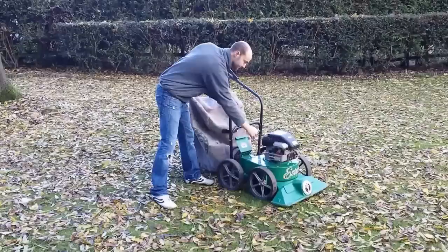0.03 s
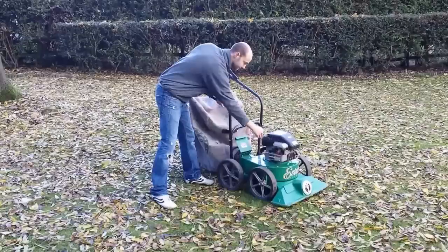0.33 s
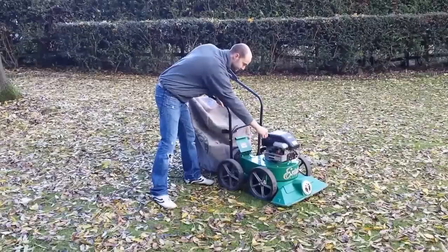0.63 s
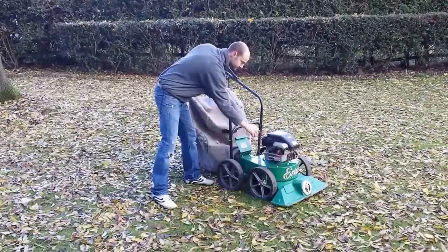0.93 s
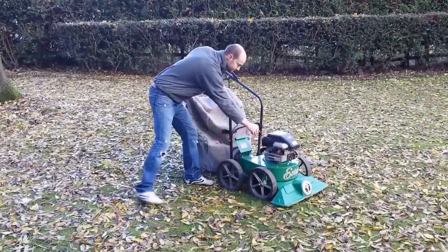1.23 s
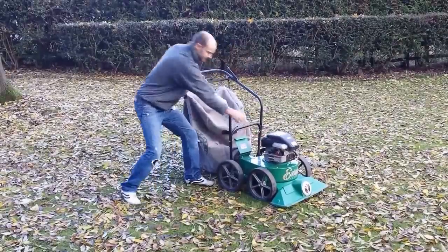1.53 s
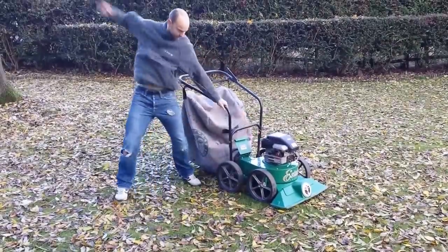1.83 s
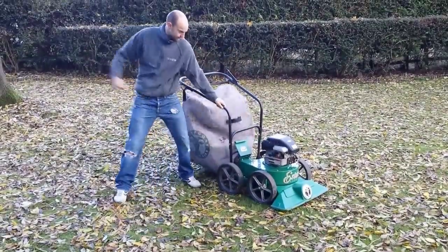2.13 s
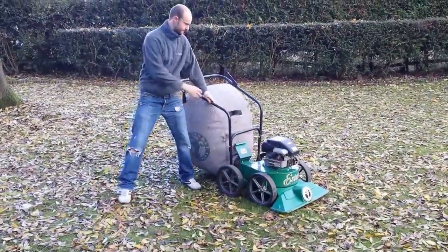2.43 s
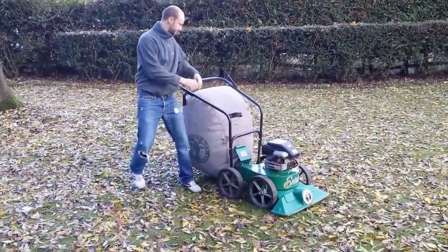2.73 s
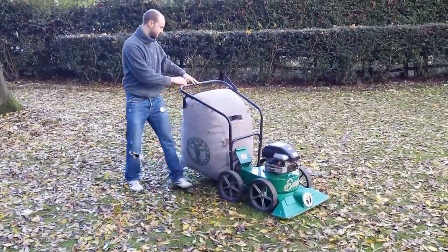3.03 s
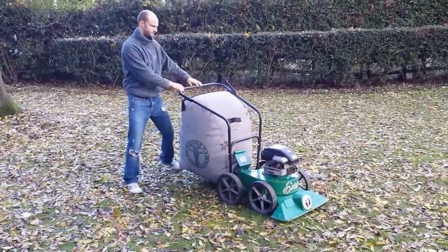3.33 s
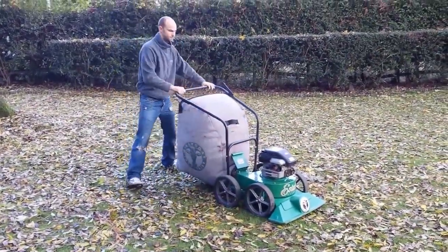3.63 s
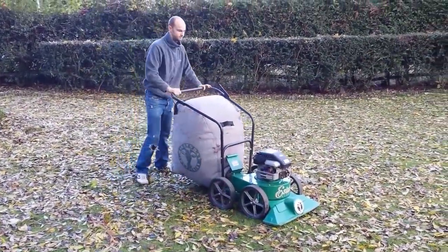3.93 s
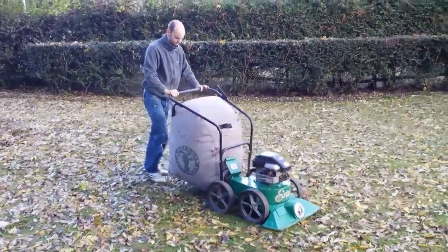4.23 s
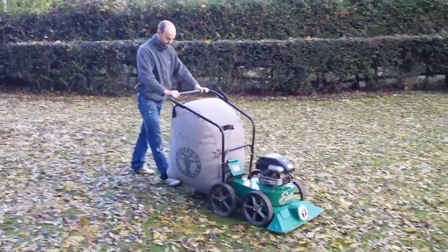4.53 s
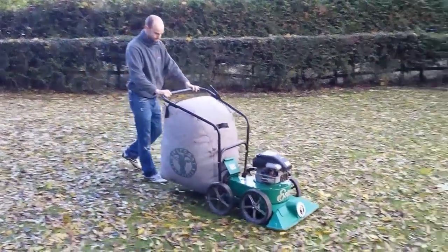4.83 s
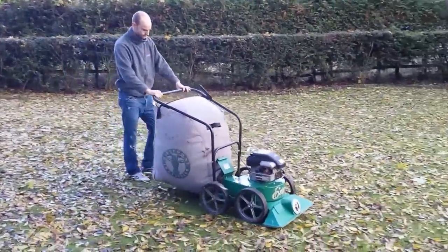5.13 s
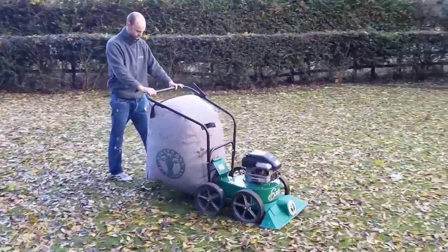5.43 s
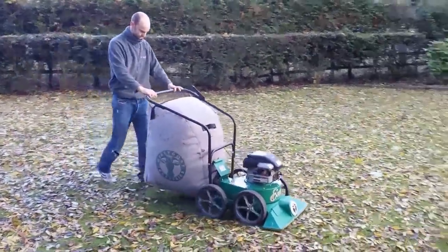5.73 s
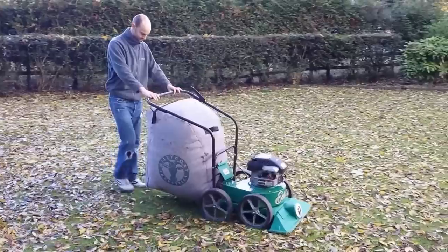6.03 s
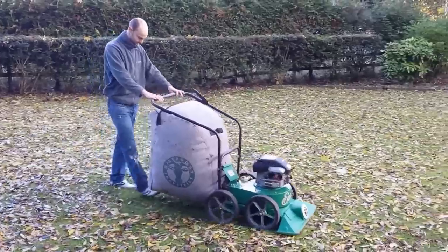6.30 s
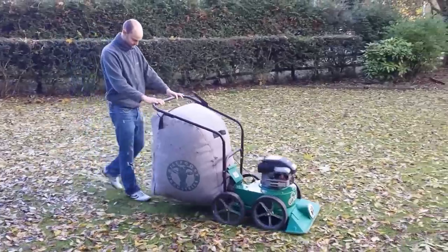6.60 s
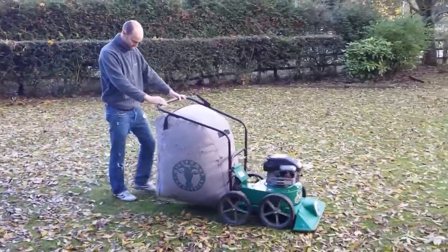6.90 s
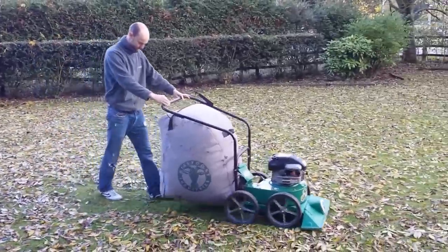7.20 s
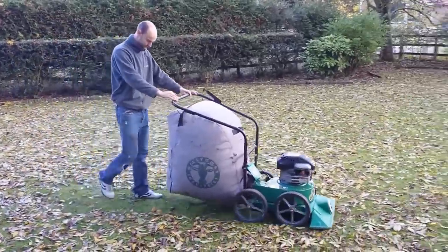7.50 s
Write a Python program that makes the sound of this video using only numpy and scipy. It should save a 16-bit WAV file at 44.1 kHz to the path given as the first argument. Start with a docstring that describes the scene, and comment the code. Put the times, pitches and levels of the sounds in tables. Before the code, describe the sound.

After a moment of silence, a faint far-off engine hum and outdoor wash come in at about 0.4 seconds. A metal lever snaps sharply at 0.9 seconds. Clothes and leaves rustle from 1.3 seconds, then a starter cord whirrs out at around 1.6, with rasping chatter and a few hard clacks. At 1.8 seconds the lawn vacuum's small petrol engine catches, a few metres from the microphones, and rises in pitch to a loud drone with a thumping, spitting exhaust and metallic ticking. Dull bumps and a ringing clank come between 2.5 and 2.8 seconds. Dry leaves rattle and hiss through the housing. The engine sags from about 3.9 seconds and recovers by 5.5. Twigs crack sharply against the housing several times between 4.4 and 7 seconds. The drone turns slightly buzzier late on and runs to the end, at about 7.6 seconds.

```python
"""A leafy lawn, two microphones a few metres from a petrol lawn vacuum, another engine humming far off.
A lever clicks, the cord is pulled, and the four-stroke single runs up to its governed speed.
Its impeller drones, the exhaust thumps and spits once every two turns, and sucked-up leaves
rattle through the housing. The engine sags under load and recovers; late on, the machine turns side-on."""
import sys
import numpy as np
from scipy import signal
from scipy.fft import rfft, irfft
from scipy.io import wavfile
from scipy.ndimage import uniform_filter1d, map_coordinates

SR = 44100
rng = np.random.default_rng(int(sys.argv[2]) if len(sys.argv) > 2 else 0)


def to_wav(sig):
    """Store sig (one row per channel, or 1-D mono) as 16-bit WAV at the path in sys.argv[1].

    Samples outside -1..1 are clipped; the rate is SR.
    """
    pcm = np.clip(np.atleast_2d(sig), -1, 1) * 32767
    pcm = np.round(pcm).astype(np.int16)
    wavfile.write(sys.argv[1], SR, pcm.T)  # frames by channels


N = 333396
T = np.arange(N) / SR
PULL_S, SUCTION_S, FIRST_FIRING_S = 1.515, 1.755, 1.829
GOVERNED_SPEED = 55.79  # turns per second

# the far engine's lowest tones, beating together (frequency [Hz], level [dB])
FAR_TONES = [(57.5, -43.5), (64.5, -73)]
# its third harmonic comes and goes (start [s], length [s], level [dB])
FAR_THIRD_SWELLS = [(.4, 0.15, -41.5), (.79, 0.41, -36)]
# the wash of the neighbourhood (frequency [Hz], level [dB])
WASH_COLOUR = [(20, -24), (50, -4.5), (200, -9.5), (330, -9.5), (450, -15), (850, -14), (1900, -24.5),
               (5500, -31), (8000, -40), (15000, -56)]
# the control lever snapping over and settling (time [s], level [dB])
LEVER_SNAPS = [(0.9195, -15), (0.937, -26), (1.038, -39)]
# the lever's resonances (frequency [Hz], width [Hz], level [dB])
LEVER_MODES = [(910, 150, 3), (2640, 660, -5), (3700, 740, -3), (4280, 250, -7), (4380, 440, -1),
               (5720, 140, 0.5), (8600, 1200, -11.5)]
# the crack of a hard hit (frequency [Hz], level [dB])
CRACK_COLOUR = [(200, -7.5), (900, -23), (2200, -7), (3300, 4.5), (5000, 16), (7000, 0.5), (15000, -20)]
# shoes and sleeve rustling, then the cord running out (start [s], length [s], level [dB])
RUSTLES = [(1.26, 0.085, -41), (1.46, 0.14, -40.5), (1.64, 0.1, -30.5)]
# the hiss of leaves, cloth and rushing air (frequency [Hz], level [dB])
RUSTLE_COLOUR = [(200, -26), (700, -16), (1900, -12.5), (2800, -8), (3800, -3.5), (5000, 0.5), (5700, -2),
                 (6800, -9.5), (9500, -9.5), (12000, -11.5), (14500, -21.5)]
# the machine body's resonances (frequency [Hz], width [Hz], level [dB])
BODY_MODES = [(305, 37, 3), (553, 91, 2), (716, 294, 0), (910, 230, 1), (1375, 280, -1.5),
              (2240, 450, -6.5)]
# the cord whirring through its guide (start [s], length [s], level [dB])
CORD_WHIRR = [(1.63, .19, -35)]
# the starter rasping as the cord runs out and winds back (time [s], ring [Hz], level [dB])
REEL_RASPS = [(1.64, 2800, -36.5), (1.68, 1400, -33), (1.743, 1430, -24.5), (1.757, 2920, -21.5),
              (1.801, 1640, -22.5), (1.855, 2640, -20.5), (1.935, 2560, -24.5), (2.015, 6860, -15)]
# patches of leaves under the nozzle (start [s], length [s], level [dB])
LEAF_PATCHES = [(1.76, 0.39, -27), (3.78, 0.034, -31), (4.24, 0.92, -27.5), (5.6, 2.0, -30)]
# sharp knocks on the impeller and housing (time [s], level [dB])
HOUSING_STRIKES = [(1.7654, -9.5), (1.7853, -3), (1.877, -2), (2.667, -10), (4.379, -4), (4.5375, -4),
                   (4.6159, -14), (5.1272, -7), (5.2886, -6), (6.169, -1.5), (6.512, -5), (6.9797, -4.5)]
# the muffler's resonances (frequency [Hz], width [Hz], level [dB])
MUFFLER_MODES = [(85, 35, 0), (128, 74, 3), (205, 77, 3), (290.5, 77, -2)]
# the spit of exhaust gas (frequency [Hz], level [dB])
SPIT_COLOUR = [(500, -12.5), (2500, -16), (4800, 7), (7000, -3.5), (9000, 2.5), (14500, -6)]
# duct resonances that the drone sweeps through (frequency [Hz], half width [Hz], gain [dB])
DUCT_MODES = [(116.4, 22, 9.5), (195.3, 8.6, 7)]
# the drone's weaker harmonics at governed speed (harmonic [number], level [dB])
DRONE_HARMONICS = [(3, -36), (4, -52), (5, -46.5), (6, -47), (7, -54), (8, -53)]
# the drone swells or sinks briefly (time [s], half length [s], gain [dB])
DRONE_SWELLS = [(2.493, 0.076, 10), (4.14, .14, 7), (4.9, 0.088, 2), (5.76, 0.55, -2.4)]
# its third harmonic fades for a while (time [s], half length [s], gain [dB])
THIRD_DIPS = [(3.1, 0.18, -7), (5.463, 0.53, -10.5)]
# dull bumps (time [s], level [dB])
BUMPS = [(2.49, -23), (2.65, -19.5), (3.935, -17)]
# hard debris hitting the impeller (time [s], level [dB])
DEBRIS_HITS = [(2.7505, -8.5)]
# the impeller's ring (frequency [Hz], width [Hz], level [dB])
IMPELLER_MODES = [(1410, 82, -2), (3270, 280, -1), (5120, 200, 2)]
# likeness of the two microphones (frequency [Hz], correlation [0 to 1])
MIC_LIKENESS = [(25, 0.75), (90, .995), (650, 0.7), (1400, 0.75), (4000, 0.55), (14000, 0.049)]
# left microphone minus right (frequency [Hz], level [dB])
MIC_BALANCE = [(100, -1), (300, -2.5), (800, -0.5), (1400, 0), (2000, 3.5), (2400, 3.5), (3300, 12.5),
               (4400, 12), (5400, 12.5), (6600, 3), (7800, 6.5), (10000, 5), (14000, 2.5)]
# the left microphone's lead over the right (frequency [Hz], phase [rad])
MIC_PHASE = [(700, 0), (1120, 1.47), (1380, 0.63), (1720, 1.48), (2070, 1), (3100, 1.66), (6000, 0.4),
             (14000, 1.5)]


def amp(db):
    return 10 ** (np.asarray(db) / 20)


def unit(x):
    """Scale to rms 1."""
    return x / np.sqrt(np.mean(x ** 2))


def across(points):
    """Spread (frequency [Hz], value) rows over the frequency axis."""
    hz, value = np.transpose(points)
    return np.interp(np.log(np.arange(N + 1) * SR / (2 * N) + 1), np.log(hz), value)


def shape(x, response):
    """Filter by a frequency response."""
    return irfft(rfft(x, 2 * N) * response)[..., :N]


def colour(x, points):
    """Filter by (frequency [Hz], level [dB]) rows, to rms 1."""
    return unit(shape(x, amp(across(points))))


def ring(x, modes):
    """Resonances side by side, of alternating sign."""
    return sum((-1) ** k * amp(db) * signal.lfilter(*signal.iirpeak(hz, hz / width, SR), x)
               for k, (hz, width, db) in enumerate(modes))


def air():
    """Noise at both microphones: alike in the bass, drifting apart in the treble."""
    likeness = np.clip(across(MIC_LIKENESS), 0, 1)
    mid, side = shape(rng.standard_normal((2, N)), np.sqrt([1 + likeness, 1 - likeness]))
    return unit(np.array([mid + side, mid - side]))


def walk(per_s):
    """Smooth random wander with a spread near 1."""
    return map_coordinates(rng.standard_normal(4096), [T * per_s], order=3, mode="wrap")


def fade(hits, t60):
    """Each hit jumps up and dies away, by 60 dB in t60 seconds."""
    return signal.lfilter([1], [1, -amp(-60 / (t60 * SR))], hits + 1e-18)


def blows(rows):
    """One impulse for each (time [s], level [dB]) row."""
    s, db = np.transpose(rows)
    return np.bincount((s * SR).astype(int), amp(db), N)


def beats(cycle):
    """One impulse each time the cycle comes round."""
    return np.diff(np.floor(cycle), prepend=np.floor(cycle[0]))


def swells(rows, attack_s, release_s):
    """Each (start [s], length [s], level [dB]) row rises, holds and dies away."""
    return sum(amp(db) * (1 - np.exp(-np.maximum(T - s, 0) / attack_s))
               * np.exp(-np.maximum(T - s - length, 0) / release_s) for s, length, db in rows)


def humps(x, rows):
    """A bell-shaped rise or dip along x for each (centre, half width, gain [dB]) row."""
    return sum(db * np.exp(-((x - centre) / width) ** 2) for centre, width, db in rows)


def far_engine(hz=65):
    """Far off, an engine hums in the wash of the neighbourhood; both recede once the vacuum runs."""
    angle = 2 * np.pi * hz * T + 0.046 * walk(2.8)
    hum = sum(amp(db) * np.sin(2 * np.pi * tone_hz * T) for tone_hz, db in FAR_TONES)
    third = swells(FAR_THIRD_SWELLS, attack_s=0.067, release_s=.08)
    hum += amp(-38) * np.sin(2 * angle) + third * np.sin(3 * angle)
    wash = colour(air(), WASH_COLOUR) * amp(-35 + 0.2 * walk(6.1))
    return (np.sqrt(2) * hum + wash) * amp(np.interp(T, [1.8, 2.8], [0, -8]))


def lever():
    """The metal lever snaps over with a crack and rings on faintly."""
    hits = blows(LEVER_SNAPS)
    metal = amp(-4) * (unit(ring(air(), LEVER_MODES)) + colour(air(), CRACK_COLOUR))
    return metal * (fade(hits, t60=0.038) + amp(-14) * fade(hits, t60=0.27))


def rustle():
    """Leaves and cloth rub in short, grainy hisses around the pull."""
    hiss = colour(air() * amp(2.5 * walk(280)), RUSTLE_COLOUR)
    return hiss * swells(RUSTLES, attack_s=0.025, release_s=0.074)


def clatter(cycle, level_db=-32):
    """Valves, piston and deck knock alike every cycle, over loose rattling that swells each turn."""
    pattern = rng.standard_normal(400) * amp(2.1 * rng.standard_normal(400))
    knocks = np.interp(cycle % 1, np.linspace(0, 1, len(pattern)), pattern) * amp(2 * walk(60))
    loose = air() * amp(2 * np.cos(4 * np.pi * cycle))
    body = unit(amp(-2) * unit(ring(knocks, BODY_MODES)) + unit(ring(loose, BODY_MODES)))
    return body * amp(level_db + 2 * side_on() ** 2) * np.clip((T - PULL_S) / 0.35, 0, 1)


def cord(start_hz=1300, rise_hz_per_s=1150):
    """The cord runs through its guide ever faster: a rough whirr that rises in pitch."""
    hz = start_hz + rise_hz_per_s * np.clip(T - PULL_S, 0, .25)
    angle = 2 * np.pi * np.cumsum(hz) / SR
    whirr = walk(140) * np.cos(angle) + walk(140) * np.sin(angle)
    return whirr * swells(CORD_WHIRR, attack_s=.1, release_s=.02)


def starter_reel(width_share=0.23, rise_s=0.0088):
    """The reel and its pawls chatter in short rasps, each ringing at its own pitch."""
    chatter = air() * amp(4 * walk(250))
    rasps = 0
    for s, hz, db in REEL_RASPS:
        swell = uniform_filter1d(fade(blows([(s, db)]), t60=0.23), int(rise_s * SR) + 1)
        rasps += swell * unit(ring(chatter, [(hz, width_share * hz, 0)]))
    return rasps


def leaves(chips_per_s=700, rush=0.93, airflow_db=-30, shred_db=-7):
    """Dry leaves shatter on the impeller: uneven chips over the rush of air, and a fine hiss of shreds."""
    chips = (rng.random(N) < chips_per_s / SR) * amp(3 * np.minimum(rng.exponential(size=N), 5))
    grain = unit(np.sqrt(rush ** 2 + unit(fade(chips, t60=0.028)) ** 2))
    airflow = amp(airflow_db) * np.clip((T - SUCTION_S) / 0.038, 0, 1)
    intake = swells(LEAF_PATCHES, attack_s=0.22, release_s=0.51)  # the housing fills and clears
    rattle = (airflow + intake) * colour(air() * grain, RUSTLE_COLOUR)
    hiss = colour(air() * grain, [(3000, -30), (8000, -2), (12000, 14), (14500, -24)])
    return (rattle + amp(shred_db) * intake * hiss) * amp(3 + 0.92 * walk(35))


def strikes():
    """The starter's clacks, then twigs and stalks, crack against the housing."""
    return amp(-8) * fade(blows(HOUSING_STRIKES), t60=0.065) * colour(air(), CRACK_COLOUR)


def crank_speed(catch=21.122, unloaded=57.495, sagged=49.815,
                run_up_s=.618, load_at_s=3.866, sag_s=.63, recover_s=.412):
    """Turns per second: the engine runs up freely, sags under load, and the governor restores it."""
    running_s = np.maximum(T - FIRST_FIRING_S, 0)
    free = unloaded - (unloaded - catch) * np.exp(-(running_s / run_up_s) ** 1.219)
    recovering_s = np.maximum(T - load_at_s - sag_s, 0)
    governed = GOVERNED_SPEED - (GOVERNED_SPEED - sagged) * np.exp(-recovering_s / recover_s)
    ramp = np.clip((T - load_at_s) / sag_s, 0, 1)
    load = ramp ** 2 * (3 - 2 * ramp)
    return free + load * (governed - free)


def throttle(speed, cruise_db=-4, governor_db=3.5):
    """Firing strength [dB]: the governor opens up as the speed falls short, as far as wide open."""
    share = speed / GOVERNED_SPEED
    wanted_db = cruise_db + governor_db * (10 * (1 - share)) ** 2
    wide_open_db = 4.5 + 11 * np.log10(share)
    return np.where(T > FIRST_FIRING_S - .03, np.minimum(wanted_db, wide_open_db), -80)


def exhaust(cycle, throttle_db, thump_db=-35, burble_db=-28, bark_db=-27, spit_db=-11.5):
    """Each firing thumps the muffler, barks in the body and spits gas; the flow burbles on between."""
    firings = beats(cycle) * amp(1.8 * walk(30))
    thump = amp(thump_db) * unit(ring(firings, MUFFLER_MODES))
    burble = unit(ring(air(), MUFFLER_MODES)) * amp(burble_db + 2 * np.cos(2 * np.pi * cycle))
    boom = signal.sosfilt(signal.butter(3, [65, 380], "band", fs=SR, output="sos"), thump + burble)
    bark = amp(bark_db) * fade(firings, t60=0.12) * unit(ring(air(), BODY_MODES))
    puff = uniform_filter1d(fade(firings, t60=.023), size=64)  # the valve takes about 1.5 ms to open
    spit = amp(spit_db + 0.84 * throttle_db) * puff * colour(air(), SPIT_COLOUR)
    return (boom + bark) * amp(throttle_db) + spit


def duct(hz, bass_hz=69.6):
    """Gain for a tone: the duct resonates, and the housing radiates little below bass_hz."""
    return amp(humps(hz, DUCT_MODES)) / np.sqrt(1 + (bass_hz / hz) ** 8)


def impeller(cycle, speed, fundamental_db=-26, octave_db=-25):
    """Four suction dips to an engine cycle drone through the duct, unsteady at low speed."""
    share = speed / GOVERNED_SPEED
    growth_db = 38 * np.log10(share)
    swell_db = humps(T, DRONE_SWELLS)
    turned = side_on()
    fundamental = amp(fundamental_db + growth_db + swell_db) * duct(2 * speed)
    octave = amp(octave_db + growth_db + 0.62 * swell_db + 5 * turned) * duct(4 * speed)
    angle = 8 * np.pi * cycle
    drone = fundamental * np.cos(angle) + octave * np.cos(2 * angle)
    shift_db = {3: humps(T, THIRD_DIPS), 6: 9 * turned}
    for k, db in DRONE_HARMONICS:
        turbulence_db = 3 * walk(5.4)
        level_db = db + shift_db.get(k, -3 * turned) + 0.57 * swell_db + turbulence_db
        drone += np.cos(k * angle + k - 2) * amp(level_db) * share ** 2
    flutter = amp(1.23 * walk(30) / share ** 2)
    return -np.sqrt(2) * drone * flutter * (cycle > 0)


def valve(cycle, throttle_db, lead_cycles=0.14, ring_hz=5200, width_hz=70):
    """A metallic ping comes just before each spit, hardest at open throttle."""
    ticks = beats(cycle + lead_cycles) * amp(3.6 * throttle_db + 2 * walk(30)) * (cycle > 0)
    pings = ring(ticks, [(ring_hz, width_hz, 0)])
    return amp(-10.5) * pings / np.abs(pings).max()


def bumps():
    """A few dull bumps: short bursts of low noise."""
    rumble = colour(air(), [(20, -2), (60, 1), (300, -3), (700, -12), (2000, -21), (8000, -60)])
    return rumble * fade(blows(BUMPS), t60=0.095)


def clank():
    """A hard bit of debris sets the impeller ringing."""
    return fade(blows(DEBRIS_HITS), t60=0.05) * unit(ring(air(), IMPELLER_MODES))


def side_on(start_s=5.5, length_s=1.5):
    """How far the machine has turned side-on to the microphones, 0 to 1."""
    return np.clip((T - start_s) / length_s, 0, 1)


def scene():
    """The vacuum over the far hum; one crankshaft times its engine sounds, two turns to a cycle."""
    speed = crank_speed()
    throttle_db = throttle(speed)
    cycle = np.cumsum(speed) / SR / 2
    cycle -= np.interp(FIRST_FIRING_S, T, cycle)  # count from the first firing
    engine = impeller(cycle, speed) + exhaust(cycle, throttle_db)
    engine += valve(cycle, throttle_db) + clatter(cycle)
    return (engine + starter_reel() + leaves() + strikes() + clank()
            + lever() + rustle() + bumps() + far_engine() + cord())


def record(dry, ceiling=.88, top_hz=14650):
    """Two unequal microphones; the recorder fades in, rounds the loudest peaks and cuts the top."""
    sides = np.array([[.5], [-.5]])
    balance = amp(sides * across(MIC_BALANCE))
    balance /= np.sqrt(np.mean(balance ** 2, axis=0))
    heard = shape(dry, balance * np.exp(1j * sides * across(MIC_PHASE)))
    heard *= np.clip((T - .385) / 0.071, 0, 1)
    rounded = heard / (1 + (heard / ceiling) ** 6) ** (1 / 6)
    return signal.sosfiltfilt(signal.ellip(8, .1, 45, top_hz, fs=SR, output="sos"), rounded)


dry = scene()
out = record(dry)
to_wav(out)
```